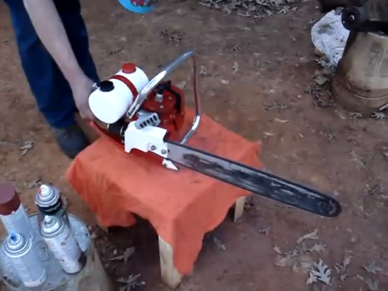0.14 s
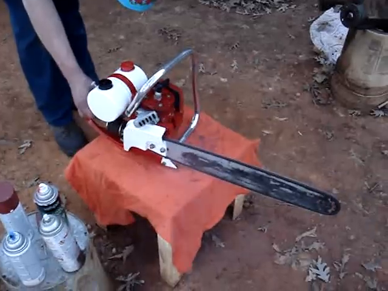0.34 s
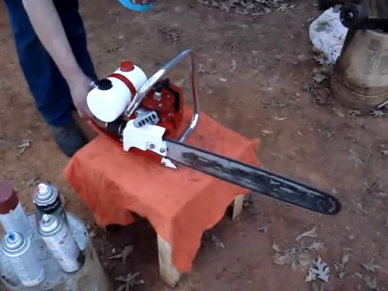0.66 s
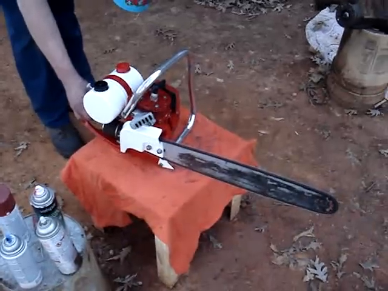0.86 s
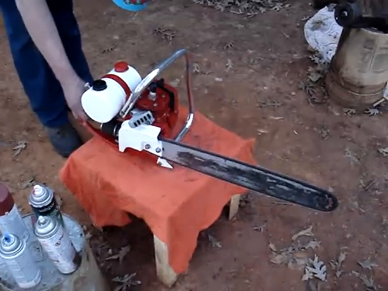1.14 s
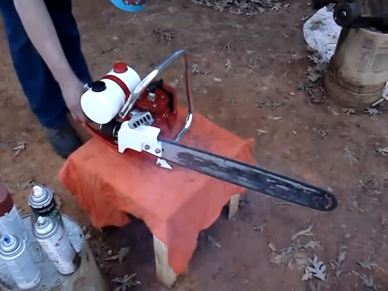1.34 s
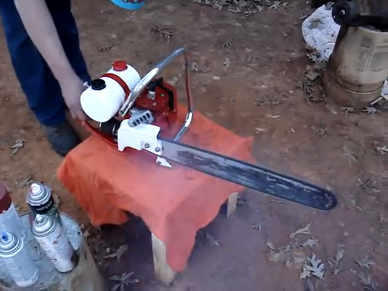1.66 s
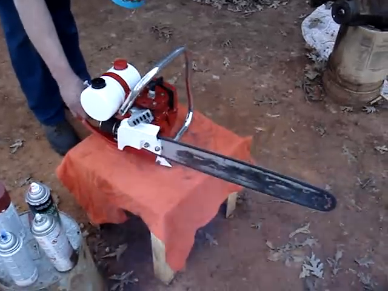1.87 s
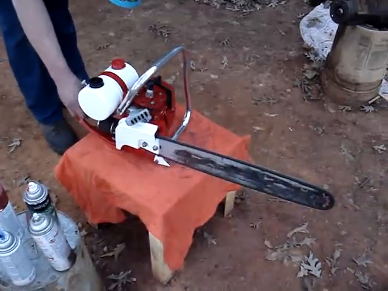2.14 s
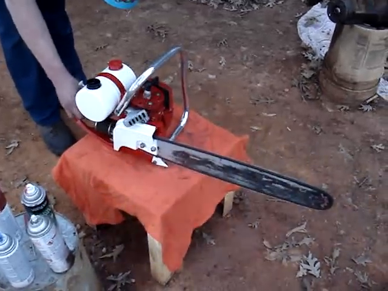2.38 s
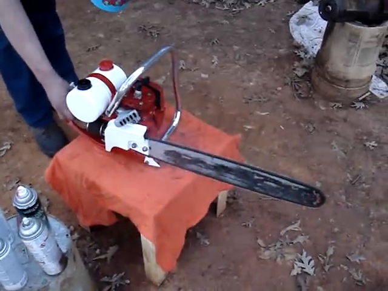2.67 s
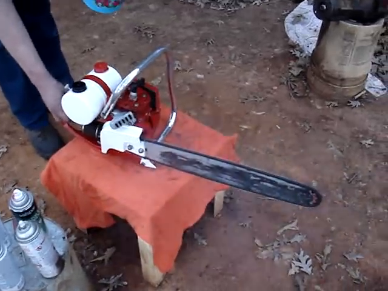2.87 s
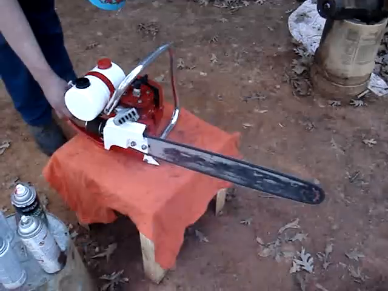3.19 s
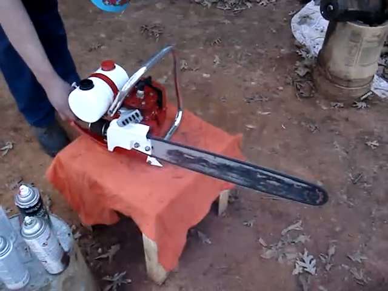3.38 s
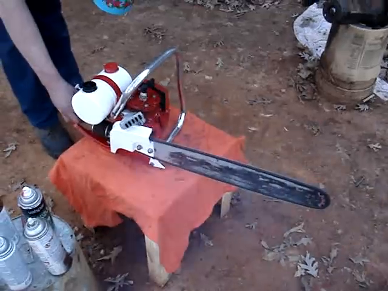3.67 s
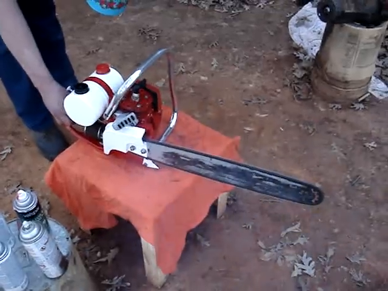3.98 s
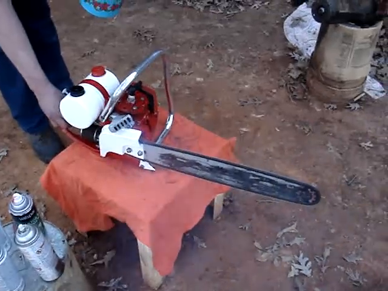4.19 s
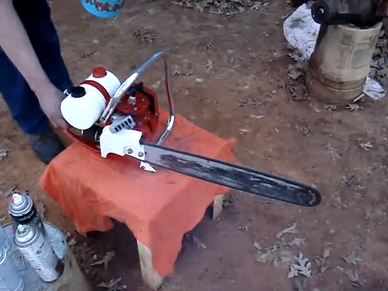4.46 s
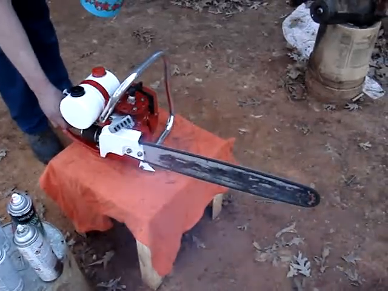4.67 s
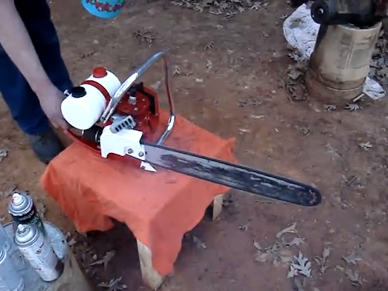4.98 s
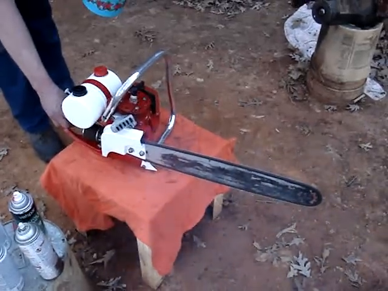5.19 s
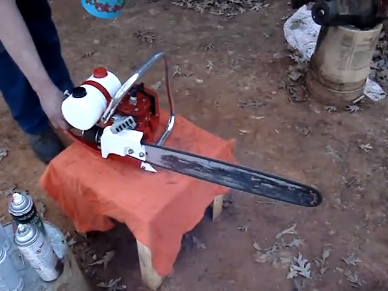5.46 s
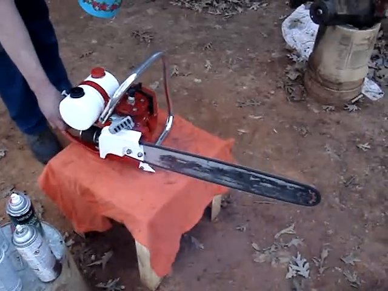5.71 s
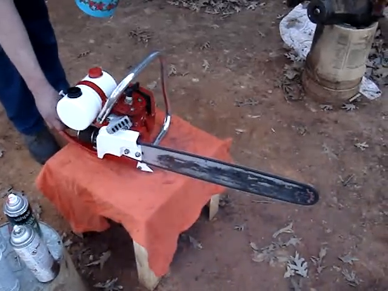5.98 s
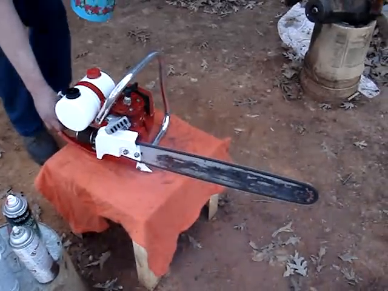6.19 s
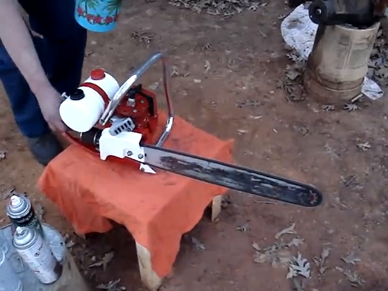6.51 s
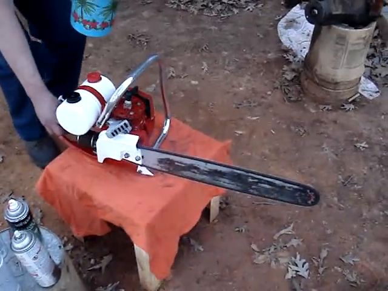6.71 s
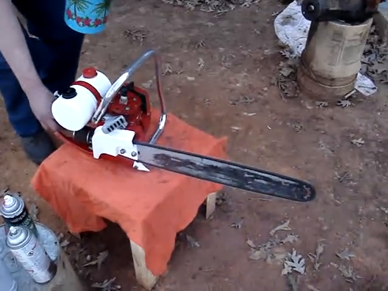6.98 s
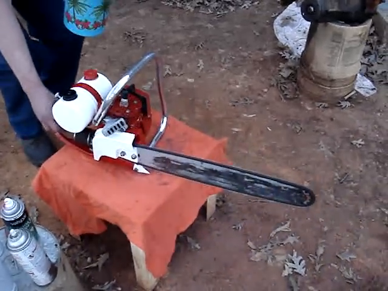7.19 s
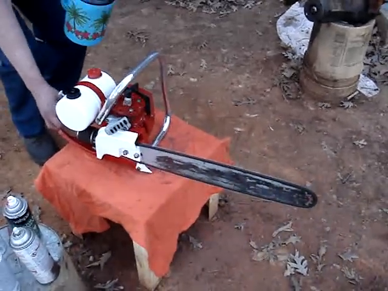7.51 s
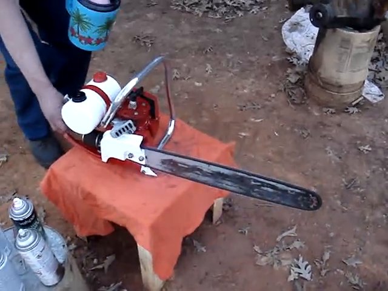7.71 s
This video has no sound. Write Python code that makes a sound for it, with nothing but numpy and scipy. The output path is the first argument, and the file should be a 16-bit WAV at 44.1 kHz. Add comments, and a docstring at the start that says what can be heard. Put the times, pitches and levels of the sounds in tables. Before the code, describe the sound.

Close, dry chainsaw engine sputters unevenly, surges to a harsh high rasp, drops to hollow puttering, and surges again with throttle blips.

```python
"""Two-stroke chainsaw revving on a low table

A small engine runs rich outdoors and fires on only some turns; fired turns bang through struck resonances.
Every turn the exhaust port puffs through damped modes and the carburettor throat honks as a tone pulse.
Fan and chain hiss as shaped noise, metal rings as narrow-band noise, and links and clutch tick at random.
One dull, inverted echo returns from below, over a faint distant rumble."""
import sys
import numpy as np
from scipy import signal
from scipy.io import wavfile

SR = 44100
rng = np.random.default_rng(int(sys.argv[2]) if len(sys.argv) > 2 else 0)


def master_out(mix):
    """Clip the mix to full scale and print it as 16-bit PCM to the path in sys.argv[1]."""
    frames = np.transpose(np.atleast_2d(mix))
    ceiling = np.clip(frames, -1, 1)
    pcm = np.round(ceiling * 32767).astype(np.int16)
    wavfile.write(sys.argv[1], SR, pcm)


N = 346185   # length in samples
MID_SPEED = 70   # turns per s about which levels vary with speed

# firing rhythm, each row holding until the next: # [t/s, turns per burn; 99 = one burn, then none until the
# next row]; odd burns from a second table are added or reshaped
FIRING_RHYTHM = [(.005, 2), (.091, 3), (.1787, 3), (.2205, 1), (.2459, 3), (.2873, 1), (.3014, 3),
                 (.4312, 2), (.4609, 1), (.4755, 2), (.5049, 1), (.5197, 2), (.549, 3), (.5931, 1),
                 (.6227, 3), (.7805, 1), (.8684, 3), (.9823, 2), (1.0212, 1), (1.061, 3), (1.1205, 1),
                 (1.2513, 1), (1.3807, 2), (1.5017, 2), (1.6083, 2), (1.7252, 2), (1.8665, 2), (1.9039, 99),
                 (2.4567, 3), (2.5849, 1), (2.6067, 2), (2.705, 1), (2.7511, 1), (2.8475, 1), (2.9326, 3),
                 (3.0277, 2), (3.1188, 1), (3.2512, 2), (3.3815, 3), (3.4178, 2), (3.4419, 1), (3.4659, 2),
                 (3.5985, 1), (3.6577, 2), (3.7495, 2), (3.8545, 3), (3.9601, 2), (4.0239, 3), (4.0517, 2),
                 (4.1951, 3), (4.2244, 2), (4.2442, 3), (4.3636, 2), (4.5159, 2), (4.557, 1), (4.5673, 2),
                 (4.5879, 3), (4.7119, 3), (4.8793, 3), (4.9756, 2), (5.0749, 2), (5.1628, 1), (5.1731, 2),
                 (5.2802, 2), (5.4081, 3), (5.504, 2), (5.5794, 3), (5.612, 2), (5.6888, 2), (5.8546, 3),
                 (5.9203, 2), (5.9745, 3), (6.0065, 2), (6.0494, 4), (6.0929, 3), (6.2237, 2), (6.3005, 2),
                 (6.3446, 4), (6.3883, 3), (6.4225, 2), (6.4443, 99), (6.6706, 1), (6.6868, 3), (6.735, 2),
                 (6.8859, 1), (6.9614, 1), (7.0285, 2), (7.1499, 99), (7.594, 1), (7.6695, 1), (7.7422, 2),
                 (7.8358, 99)]


def from_db(db):
    """Amplitude ratio of a level: 20 dB is a factor of ten."""
    return 10 ** (np.asarray(db) / 20)


def rms_one(x):
    """Normalisation to unit root-mean-square."""
    return x / np.sqrt(np.mean(x ** 2) + 1e-20)


def drift(rate_hz):
    """Slow random fluctuation of rms 1: white noise through a two-pole low-pass."""
    r = np.exp(-2 * np.pi * rate_hz / SR)
    noise = rng.standard_normal(N + SR)
    return rms_one(signal.lfilter([1], [1, -2 * r, r * r], noise)[SR:])   # the first second settles


def ring(x, modes):
    """Damped resonance: a unit impulse sets each mode ringing as a decaying sine of its level."""
    out = np.zeros(N)
    for hz, width_hz, level_db in modes:
        r = np.exp(-np.pi * width_hz / SR)
        w = 2 * np.pi * hz / SR
        mode = signal.lfilter([0, np.sin(w)], [1, -2 * r * np.cos(w), r * r], x + 1e-18)
        out += from_db(level_db) * mode
    return out


def butter(x, hz, kind, order=2):
    """Butterworth filter: maximally flat passband."""
    return signal.sosfilt(signal.butter(order, hz, kind, fs=SR, output="sos"), x)


def clicks(seconds, sizes):
    """Impulses: one-sample excitations at the given times."""
    out = np.zeros(N)
    at = np.clip(np.round(seconds * SR).astype(int), 0, N - 1)
    np.add.at(out, at, sizes)
    return out


def crank_angle(speed):
    """Angle in turns, the integral of speed, adjusted so that every change of rhythm is a whole turn.

    Whole numbers are exhaust openings."""
    free = np.cumsum(speed) / SR
    at_change = free[(np.array(FIRING_RHYTHM)[:, 0] * SR).astype(int)]
    whole = np.cumsum(np.maximum(np.round(np.diff(at_change)), 1))
    knots = np.r_[at_change[0] - 3, at_change, at_change[-1] + 3]
    return np.interp(free, knots, np.r_[-3, 0, whole, whole[-1] + 3] + 3)


def coasting(t):
    """Overrun clock: seconds since the throttle was let go, 0 while it is held."""
    # spells in which the engine coasts down: [start t/s, end t/s]
    coasts = [(1.905, 2.74), (6.39, 6.68), (7.151, 7.66)]
    return sum((t - start) * (t > start) * (t < end) for start, end in coasts)


def unsteady(speed):
    """Flow unsteadiness: 0 while coasting, otherwise from .1 when slow to 1 at speed."""
    held = coasting(np.arange(N) / SR) == 0
    return np.clip((speed - 62) / 30, .1, 1) * held


def firings(angle):
    """Rich-mixture misfiring: burns as (s, peak dB, crack dB against peak, dullness dB), harder after rest."""
    # strength of the burns: [t/s, relative bang level/dB, relative crack level/dB]
    burn_strength = [(0, -9.5, -6.5), (.35, -8.5, -10), (.45, -10, -15), (.75, -9.5, -18),
                     (.95, -7.5, -1.5), (1.12, -5.5, -8), (1.3, -9.5, -7), (1.9, -13, -13.5),
                     (2.5, -9.5, -1), (2.72, -10, 6), (2.8, -7.5, -10), (2.95, -10.5, -4), (3.2, -9.5, -10),
                     (3.8, -13.5, -12), (4.25, -10.5, -12.5), (4.7, -9, -10), (5.5, -11, -11.5),
                     (6.35, -10.5, -11.5), (6.7, -6, -7.5), (6.77, -8.5, -4), (7.0, -12.5, -14),
                     (7.6, -2.5, -5), (7.7, -6, -5), (7.85, -9.5, -4)]
    # odd burns, mostly dull; on turns the rhythm already fires they only change level and dullness, elsewhere
    # they add a burn: # [t/s, loss of level/dB (negative = louder), dullness/dB (negative = brighter)]
    odd_burns = [(.091, -5.5, 16), (.104, -4, 10), (.128, -0.5, 5), (.179, -3, 3.5), (.220, -5, 12),
                 (.233, -4.5, 9.5), (.288, -5, 11), (.387, 4, -2), (.564, -2, 5), (.654, -1, 2),
                 (.731, 4, 4), (.850, 4, 4), (.982, 1, 3), (1.021, 6, 7.5), (1.141, 1, 5),
                 (1.312, -3, 8), (1.367, -4, 14), (1.491, -7, 11), (2.456, 1, 8), (2.478, 2, 16),
                 (2.518, 2, 14), (2.585, 0, 19), (2.606, 5, 14), (2.630, 12, 14), (2.657, -1.5, 16),
                 (2.679, 6, 24), (2.705, 2, 25), (2.729, 0.5, 17), (2.751, 4.5, -1.5), (2.917, -5, 10),
                 (2.965, 3, 10), (3.187, 0, 7), (3.239, -9, 13), (3.322, -7, 10), (3.442, -1, 4),
                 (3.454, -4.5, 3), (3.501, -5, 15), (3.567, -5, 15), (3.628, 0, 15), (3.648, -3, 8),
                 (4.052, -1, 5), (4.089, 0, 8), (4.127, 2, 8), (4.137, 2, 2), (4.404, -1, 12),
                 (4.506, -5, 9), (4.516, 1, 10), (4.557, 1, 10), (4.998, -1.5, 7), (5.064, 3, 14),
                 (5.162, -4, 14), (5.546, 2, 16), (5.558, -3, 7), (5.678, -1, 8), (5.689, -2.5, 5),
                 (5.799, 0, 3), (5.909, -1, 5), (5.920, -9, 9), (5.963, -2, 2), (5.995, 0, 8),
                 (6.344, 0, 11), (6.355, 3, -4), (6.422, 1, 11), (6.445, 4, 10), (6.671, 4, 7),
                 (6.687, 2.5, -0.5), (6.719, 3.5, 4), (6.872, 3, 13), (7.018, -4, 2.5), (7.594, 14, 8),
                 (7.614, 5, 10), (7.632, 4, 7), (7.651, 4, 10), (7.670, 2.5, 3), (7.725, 2, 7),
                 (7.759, 2, 10), (7.791, 2, 13)]
    t = np.arange(N) / SR
    first = np.round(np.interp(np.array(FIRING_RHYTHM)[:, 0], t, angle)).astype(int)
    turns = np.arange(first[0], first[-1] + 1)
    burns = np.isin(turns, first)
    for start, end, (_, every) in zip(first, first[1:], FIRING_RHYTHM):
        burns |= np.isin(turns, range(start, end - every + 1, every))

    single_s, *single_db = np.transpose(odd_burns)
    single = np.round(np.interp(single_s, t, angle)).astype(int) - first[0]
    loss_db = np.zeros((2, len(turns)))
    loss_db[:, single] = single_db
    burns[single] = True
    weak_db, dull_db = loss_db[:, burns]

    s = np.interp(turns, angle, t)[burns]
    luck = rng.standard_normal((len(turns), 2))[burns]
    when, bang_db, sharp_db = np.transpose(burn_strength)
    # doublings of the turns since the last burn, counted up to three turns; each adds .5 dB
    rest = np.log2(np.minimum(np.diff(turns[burns], prepend=first[0] - 2), 3))
    peak_db = np.interp(s, when, bang_db) + .5 * rest + 1.5 * luck[:, 0]
    crack_db = np.interp(s, when, sharp_db) + .5 * (rest - 1) + 1.6 * luck[:, 1]
    return s, peak_db - weak_db, crack_db - peak_db - dull_db, dull_db


def distant_rumble():
    """Broadband background: low-frequency band noise at a steady, very low level."""
    return from_db(-75) * rms_one(butter(rng.standard_normal(N), [15, 120], "band", order=1))


def hiss(angle, hiss_db):
    """Turbulent and contact noise: flickering third-octaves, ringing metal and ticks, pulsing twice a turn."""
    # spectrum of the fan and chain hiss: [f/Hz, relative spectral level/dB]
    hiss_spectrum = [(150, -26), (320, -10), (650, -8), (1100, -4), (1600, -4), (2200, -3), (3400, 0),
                     (4500, -3), (7500, -5), (10000, -8)]
    # casing and bar resonances under the chain: [f/Hz, width/Hz, level against the hiss/dB]
    metal_modes = [(3383, 150, -5.5), (3092, 80, -10), (3700, 87, -9.5)]
    out = np.zeros(N)
    edges = 140 * 2 ** (np.arange(20) / 3)
    white = rng.standard_normal((2, N))   # neighbouring bands use different noise
    hz, level_db = np.transpose(hiss_spectrum)
    for k, (low, high) in enumerate(zip(edges, edges[1:])):
        band_db = np.interp(np.log(low * high) / 2, np.log(hz), level_db)
        flicker_db = 2.4 * drift(35)
        out += from_db(band_db + flicker_db) * butter(white[k % 2], [low, high], "band")

    metal = np.zeros(N)
    for mode in metal_modes:
        ringing = rms_one(ring(ring(white[0], [mode]), [mode]))
        metal += ringing * from_db(mode[2] + 2.3 * drift(28))

    # chain links and clutch tick about 700 times per s, 1 dB above the hiss
    tick_now = rng.random(N) < 700 / SR
    tick_size = from_db(4 * np.minimum(rng.exponential(1, N), 4))
    ticks = tick_now * tick_size * rng.choice([-1, 1], N)
    metal += from_db(1) * rms_one(butter(ticks, [1500, 6000], "band"))
    beat = from_db(0.13 * np.cos(4 * np.pi * (angle - .05)))
    return from_db(hiss_db - 1.5) * beat * (rms_one(out) + metal)


def intake(angle, speed, honk_db, honk_hz, burns):
    """Throat resonance excited once a turn; an open throttle makes it higher, later and shorter, low speed later."""
    t = np.arange(N) / SR
    turns = np.arange(int(angle[-1]) + 2)
    throttle = np.clip((honk_hz - 1070) / 230, 0, 1)
    delay_turns = .28 + 0.068 * throttle + 0.0693 * np.clip(1.9 - speed / 50, 0, 1)
    opened = np.interp(turns, angle - delay_turns, t)
    turn = np.clip(np.searchsorted(opened, t) - 1, 0, None)
    since = np.maximum(t - opened[turn], 0)
    rise = since / (.0026 - 0.0012 * throttle)   # the swell peaks at 1
    swell = (rise * np.exp(1 - rise)) ** 2

    ragged = unsteady(speed)
    # chance in pitch (share) and level (dB), one draw a turn
    luck = rng.standard_normal((len(turns), 2))[turn] * [.04, 2.5] * (.25 + .75 * ragged)[:, None]
    tone = np.sin(2 * np.pi * honk_hz * (1 + luck[:, 0]) * since)
    rough = (.18 + .5 * ragged) * rms_one(butter(rng.standard_normal(N), [850, 1700], "band"))
    after_burn = np.isin(turn, np.round(np.interp(burns[0], t, angle)))
    level_db = honk_db + 4.5 + luck[:, 1] - 7 * after_burn   # a burn weakens the next honk
    return -from_db(level_db) * swell * (tone + rough)


def puffs(angle, speed, puff_db):
    """Impulsive outflow: each turn a soft gas slug excites the muffler; the port whistles, less at speed."""
    # muffler outlet struck by a cold puff: [f/Hz, width/Hz, level/dB]
    puff_modes = [(850, 1370, 7), (309, 50.6, -9.5), (1240, 1230, 8), (1706, 18, -11)]
    # brief whistle of the opening exhaust port: [f/Hz, width/Hz, level/dB]
    port_whistle = [(1052, 93, -1), (1338, 52, 5)]
    at = np.flatnonzero(np.diff(np.floor(angle)) > 0)
    uneven_db = (1.2 + 2.2 * unsteady(speed)[at]) * rng.standard_normal(len(at))
    sizes = from_db(puff_db[at] + uneven_db)
    slug = ring(butter(clicks(at / SR - .0003, sizes), 960, "low"), puff_modes)
    whistle_sizes = sizes * from_db(-0.15 * (speed[at] - MID_SPEED))
    whistle = ring(butter(clicks(at / SR - .0021, whistle_sizes), 560, "low"), port_whistle)
    return -slug - whistle


def thumps(burns):
    """Low-passed pressure impulse: a spike of uneven size under each sharp bang carries the bass."""
    s, peak_db, crack_db, _ = burns
    uneven = 1.1 + .6 * rng.standard_normal(len(s))
    sizes = from_db(1.3 * (peak_db + crack_db)) * uneven
    return -from_db(12.0) * butter(clicks(s - .0002, sizes), 1500, "low")


def bangs(speed, burns):
    """Blowdown of burnt gas: build-up, blast, boom and crack excite modes; dull burns mostly ring the can."""
    # muffler outlet struck by a bang: [f/Hz, width/Hz, level/dB]
    bang_modes = [(1250, 1390, 3), (1768, 53, -23.5)]
    # lead-in pushes: [swing periods early, share of the bang size before slow-speed weighting]
    lead_in = [(.5, 0.11), (1, 0.42), (1.5, -.3), (2, 0.64)]
    # boom of the muffler can: [f/Hz, width/Hz, level/dB]
    can_boom = [(770, 1470, -9)]
    # low ring of the can, stronger after slow or dull burns: [f/Hz, width/Hz, level/dB]
    can_ring = [(597, 392, -17.5)]
    # sharp crack: [f/Hz, width/Hz, level/dB]
    crack_modes = [(2270, 1380, -8), (3680, 330, -20.5)]
    # gas noise with each crack: [from f/Hz, to f/Hz, relative level/dB]
    gas_noise = [(1990, 4900, -19), (5290, 10700, -16)]
    s, peak_db, crack_db, dull_db = burns
    size = from_db(peak_db + 3.0)
    sharp = from_db(peak_db + crack_db + 6.0)
    burn_speed = speed[(s * SR).astype(int)]
    slow = np.clip(1.75 - burn_speed / 60, .15, 1)
    slow_dull_db = dull_db * np.sqrt(slow)

    blast = size * from_db(-1.1 * slow_dull_db)
    swing_s = 0.00046 + 0.00039 * slow   # period of the swing that leads into the blast
    push = clicks(s - .0002, blast)
    for swings, share in lead_in:
        push += clicks(s - .0002 - swings * swing_s, share * slow ** swings * size)
    body = ring(butter(push, 1660, "low"), bang_modes)

    boom_db = 4.0 * slow + 2.0 * rng.standard_normal(len(s))
    body += ring(butter(clicks(s - .00025, blast * from_db(boom_db)), 1500, "low"), can_boom)
    ring_db = .5 * slow_dull_db + 11 * slow
    body += ring(butter(clicks(s + 0.00057, size * from_db(ring_db)), 1190, "low"), can_ring)

    crack = sharp * from_db(0.1383 * (burn_speed - MID_SPEED))   # rings harder at speed
    crack_push = clicks(s - .0002, crack) + clicks(s - .00065, 0.24 * crack)
    body += ring(butter(crack_push, 2800, "low"), crack_modes)

    gate = signal.lfilter([1], [1, -np.exp(-1 / (0.0021 * SR))], clicks(s - .0008, sharp))   # 2.1 ms decay
    noise = np.zeros(N)
    for low_hz, high_hz, db in gas_noise:
        noise += from_db(db) * butter(rng.standard_normal(N), [low_hz, high_hz], "band")
    return butter(gate * noise - body, 452, "high")   # the bangs keep little bass below about 450 Hz


def ground_echo(saw):
    """Delayed interference: a dull, inverted echo from below notches the spectrum."""
    lag = int(0.00216 * SR)
    late = np.r_[np.zeros(lag), saw[:-lag]]
    return -from_db(-4.5) * butter(late, 786, "low")


def colour_dips(saw):
    """Band rejection: subtracting part of a narrow band leaves a dip in the spectrum."""
    # dips in the colour of the saw: [centre f/Hz, width/Hz, share removed 0-1]
    dips = [(854, 48, 0.95), (1570, 100, 0.6), (1980, 61, 0.86)]
    for hz, width_hz, share in dips:
        saw = saw - share * butter(saw, [hz - width_hz / 2, hz + width_hz / 2], "band", order=1)
    return saw


def scene():
    """Superposition: sources locked to one crank angle add to their echo, the thumps and the rumble."""
    # crank speed: [t/s, turns per s]
    crank_speed = [(0, 82.4), (.3, 71.6), (.45, 67.8), (.62, 67.8), (.85, 55.7), (1.05, 50.4), (1.2, 53.8),
                   (1.4, 79.5), (1.65, 102.6), (1.9, 107.6), (2.33, 61.3), (2.55, 45.6), (2.7, 41),
                   (2.9, 59.4), (3.1, 67.5), (3.3, 84.8), (3.45, 83.2), (3.7, 108), (3.85, 115.9), (4, 108),
                   (4.5, 98), (5, 90.9), (5.3, 93.8), (5.7, 90.9), (6.41, 90), (6.64, 66.1), (6.72, 62.6),
                   (6.85, 69.2), (7.05, 95.4), (7.15, 101.8), (7.52, 62.8), (7.67, 52), (7.85, 70.7)]
    # carburettor throat: [t/s, relative honk level/dB, mean honk pitch f/Hz]
    throat = [(0, -29, 1150), (.35, -25, 1170), (.48, -18.5, 1360), (0.649, -15.5, 1300),
              (.85, -18.5, 1140), (1.001, -18, 1200), (1.16, -21, 1150), (1.242, -18.5, 1210),
              (1.311, -22.5, 1400), (1.45, -29, 1370), (1.75, -41, 1240), (1.88, -42, 1160),
              (2.268, -25.5, 1070), (2.42, -23, 1120), (2.58, -20.5, 1055), (2.7, -23, 990),
              (2.82, -17.5, 1280), (2.97, -24.5, 1166), (3.19, -23.5, 1240), (3.34, -28.5, 1270),
              (3.85, -39, 1240), (4.11, -38.5, 1280), (5.2, -37, 1170), (6.38, -35, 1230),
              (6.709, -23.5, 1080), (6.909, -28, 1330), (7.11, -39, 1140), (7.54, -21, 1060),
              (7.85, -24, 1170)]
    # fan and chain hiss: [t/s, relative level/dB]
    hiss_level = [(0.0, -38), (0.33, -38.5), (0.52, -36.5), (0.74, -33), (1.16, -36), (1.35, -39.5),
                  (1.88, -49.5), (2.08, -40), (2.25, -39.5), (2.75, -32), (2.97, -43.5), (3.37, -39),
                  (3.96, -49), (4.13, -44.5), (4.5, -43), (5.53, -45.5), (5.88, -43.5), (6.25, -47),
                  (6.63, -39), (6.84, -42), (7.11, -43), (7.34, -39), (7.5, -36.5), (7.85, -37.5)]
    t = np.arange(N) / SR
    s, *columns = np.transpose(throat)
    honk_db, honk_hz = [np.interp(t, s, column) for column in columns]
    hiss_db = np.interp(t, *np.transpose(hiss_level))
    speed = np.interp(t, *np.transpose(crank_speed))
    angle = crank_angle(speed)
    burns = firings(angle)

    # puffs grow a little with speed and partly follow the honk level
    puff_db = -25 + 0.0344 * (speed - MID_SPEED) + 0.61 * (honk_db - honk_db.mean())
    saw = hiss(angle, hiss_db) + intake(angle, speed, honk_db, honk_hz, burns)
    saw += puffs(angle, speed, puff_db) + bangs(speed, burns)
    saw = colour_dips(saw + ground_echo(saw))
    mix = distant_rumble() + thumps(burns) + butter(saw, 368.0, "high", order=4)
    return mix[None]


def record(dry):
    """Soft saturation rounds the peaks, then a steep low-pass cuts the top."""
    rounded = .95 * np.tanh(dry / .95)
    top_cut = signal.cheby2(12, 60, 10900, fs=SR, output="sos")   # 60 dB down from 10900 Hz up
    return signal.sosfilt(top_cut, rounded)


dry = scene()
out = record(dry)
master_out(out)
```